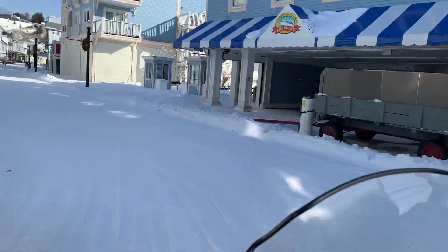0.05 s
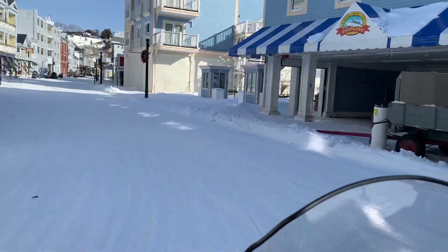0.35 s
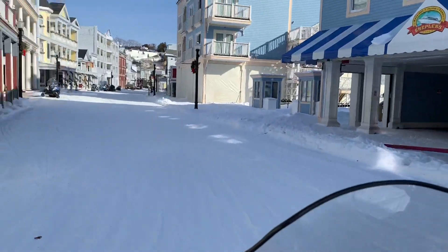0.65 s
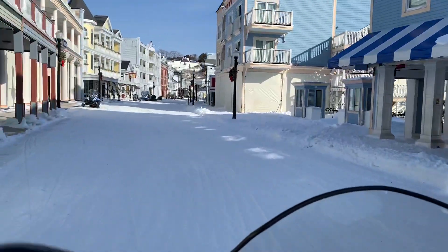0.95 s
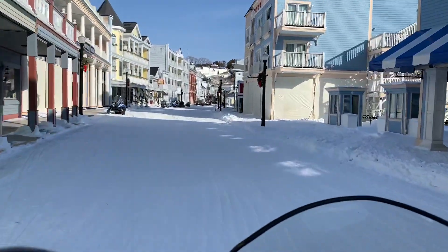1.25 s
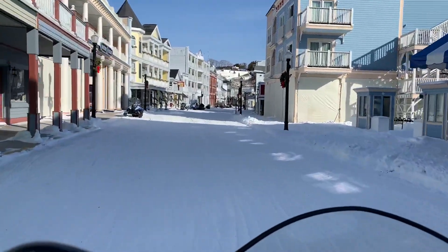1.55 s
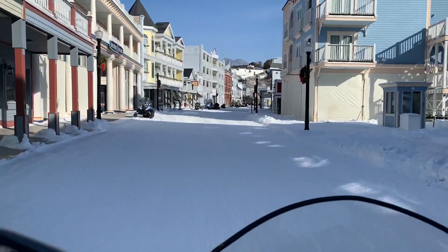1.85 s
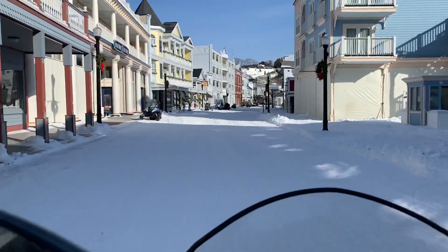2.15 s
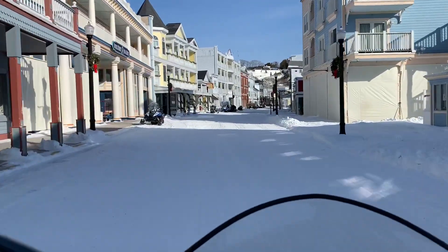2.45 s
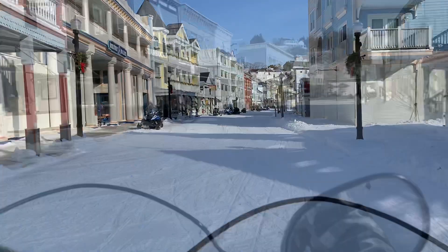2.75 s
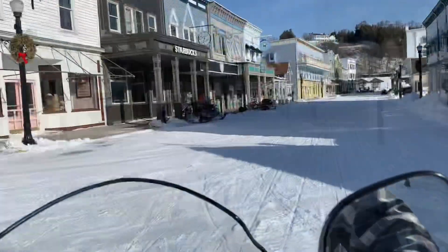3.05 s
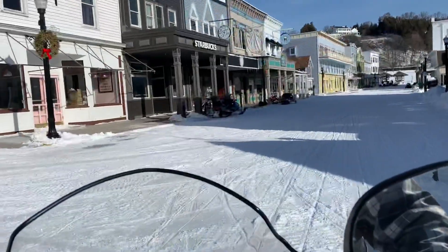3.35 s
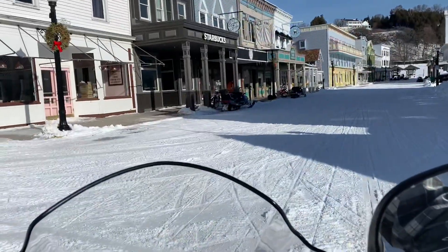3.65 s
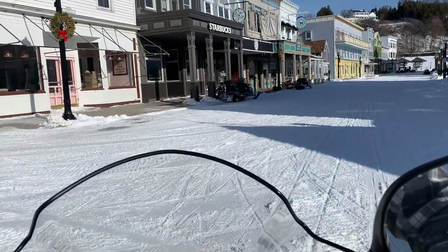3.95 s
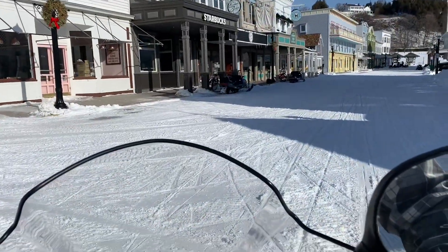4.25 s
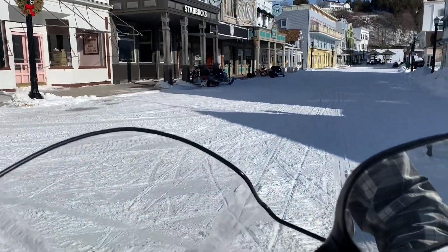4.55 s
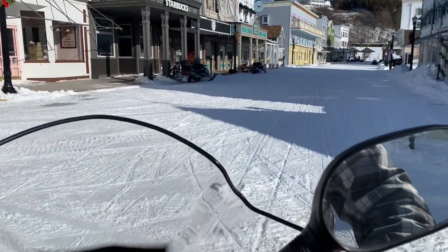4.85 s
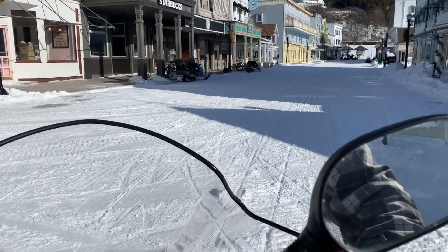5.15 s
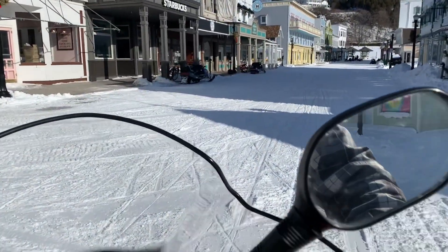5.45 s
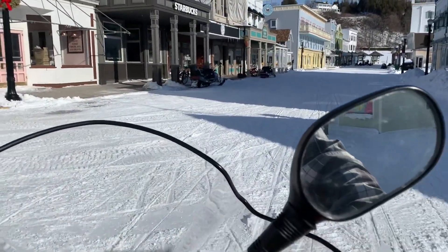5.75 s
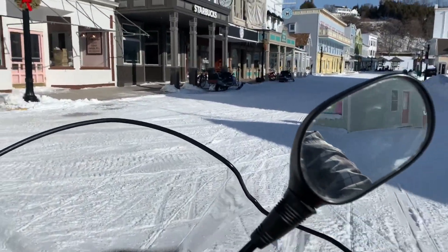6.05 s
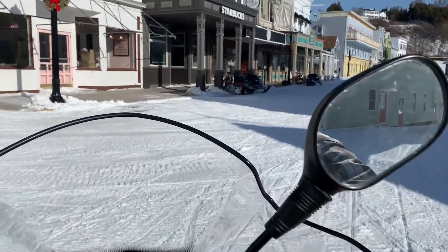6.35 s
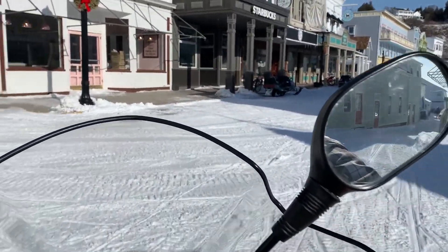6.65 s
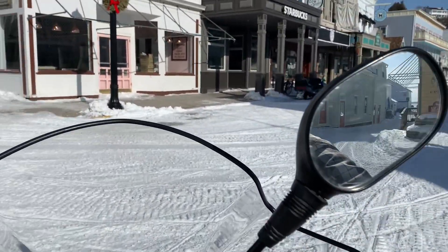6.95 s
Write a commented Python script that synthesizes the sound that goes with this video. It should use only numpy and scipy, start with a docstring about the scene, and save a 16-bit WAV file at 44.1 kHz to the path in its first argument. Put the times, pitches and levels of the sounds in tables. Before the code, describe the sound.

Outdoors, with the microphone at the rider's seat, a snowmobile runs at an even speed with a low boom and a mechanical rattle. The throttle closes, the skis bump twice, and the engine idles briefly. Then its pitch climbs through a shaking growl and a rush of intake air, tops out and drops to a steady drone. Snow hiss and wind rumble swell and fall with the engine.

```python
"""A snowmobile drones along a snowy street, heard from the saddle; as its skis knock, the scene changes and the
cruise fades out while an idling engine fades in. It revs up with a roar of air, shudders as the clutch grabs
the belt, peaks and settles. Three cylinders (four-stroke) fire in turn and make the muffler boom, while the
drive clatters. Track and skis hiss on packed snow, and wind buffets the microphone. Engine speed and throttle
steer the loudness of the boom, clatter, hiss and wind."""
import sys
import numpy as np
from scipy import signal
from scipy.fft import rfft, irfft, next_fast_len
from scipy.io import wavfile
from scipy.ndimage import uniform_filter1d, minimum_filter1d

SR = 44100
rng = np.random.default_rng(int(sys.argv[2]) if len(sys.argv) > 2 else 0)


def to_wav(sig):
    """Store sig (one row per channel, or 1-D mono) as 16-bit WAV at the path in sys.argv[1].

    Samples outside -1..1 are clipped; the rate is SR.
    """
    pcm = np.clip(np.atleast_2d(sig), -1, 1) * 32767
    pcm = np.round(pcm).astype(np.int16)
    wavfile.write(sys.argv[1], SR, pcm.T)  # frames by channels


N = 317079
TIME = np.arange(N) / SR
FFT_SIZE = next_fast_len(N, True)
BIN_HZ = np.maximum(np.arange(FFT_SIZE // 2 + 1) * SR / FFT_SIZE, 1)

# the cruise sags as the rider lets go (time [s], firing rate [Hz], change to the lowest tone [dB])
CRUISE_RUN = [(0, 100.8, -3), (0.3, 102.4, -3), (1.4, 102, -3.5), (1.75, 102.2, -2.5), (2.1, 101.8, -0.8),
              (2.56, 95, -3), (2.72, 95.1, -4.5), (2.9, 93.4, -9)]
# the pull: idle, climb, peak and settled run (time [s], firing rate [Hz])
PULL_RUN = [(2.8, 36.64), (3.01, 41.36), (3.2, 35.96), (3.28, 39), (3.37, 46), (3.5, 63.55), (3.54, 69.4),
            (3.69, 71.05), (3.95, 80.66), (4.25, 101.6), (4.41, 114.2), (4.65, 94.7), (4.88, 87.15),
            (5.33, 92.8), (5.7, 97.27), (6.35, 96.73), (6.55, 94.54), (7.19, 95.95)]
# the rider's thumb (time [s], throttle [0-1])
THUMB = [(0, 0.48), (2.1, 0.42), (2.55, 0.31), (2.9, 0.02), (3.25, 0.42), (3.52, 0.55), (3.72, 0.38),
         (4.1, 0.55), (4.26, 0.7), (4.42, 1), (4.68, 0.41), (5.7, 0.51), (7.19, 0.45)]
# An "order" is a tone at a multiple of the firing rate.
# orders 1 to 3 (level with throttle shut [dB], added by full throttle [dB])
BOOM_ORDERS = [(1, -3.5), (-1.5, 5.5), (-6.5, 11)]
# how the tailpipe passes those three (frequency [Hz], gain [dB])
TAILPIPE_GAIN = [(36, -38), (50, -17), (62, -14.5), (74, -9), (98, -7.5), (115, -11), (150, -19.5),
                 (200, -14.5), (232, -21), (262, -13.5), (285, -16.5), (305, -21), (345, -35)]
# higher tones in each puff of gas (order [x firing rate], level [dB])
HIGH_ORDERS = [(4, 2), (5, -4), (6, 0.5), (7, 1), (10, 2.5), (15, 8)]
# extra tones from unequal cylinders (multiple [x a third of the firing rate], level [dB])
UNEVEN_TONES = [(2, -16), (4, -11), (5, -13), (7, -39), (8, -7), (10, -12), (11, -6.5), (16, -5)]
# how the muffler passes the higher and extra tones (frequency [Hz], gain [dB])
MUFFLER_GAIN = [(30, -15), (70, 5.5), (150, 12), (230, 12), (290, 2.5), (350, -7), (420, -15), (460, 8),
                (490, 1), (530, -2), (590, -36), (675, -2), (780, -17), (980, -12.5), (1150, -45),
                (2000, -29)]
# where the tailpipe and muffler chambers ring (frequency [Hz], width [Hz])
PIPE_RINGS = [(100, 148), (245, 42), (280, 65)]
# how the boom reaches the two sides (frequency [Hz], left minus right [dB])
CRUISE_SIDES = [(100, -2.5), (200, -0.5), (380, -3), (700, 9)]
PULL_SIDES = [(60, 3.4), (110, 2.5), (200, 0.46), (380, 3.8), (700, 2.4)]
# clatter of clutch, chain case and track (frequency [Hz], level [dB])
CRUISE_CLATTER = [(250, 1.5), (400, 3.5), (560, 4), (800, -2), (1150, -4), (1700, -2.5), (2300, -11),
                  (3500, -12.5), (5000, -14.5), (7000, -34)]
PULL_CLATTER = [(250, 3.5), (400, 5.5), (520, 2), (620, 2.5), (900, -0.5), (1300, -2), (1680, -8.5),
                (2050, 0), (2700, -8), (3700, -10.5), (5000, -17), (7000, -23.5)]
# ringing panels and belt (frequency [Hz], half-width [Hz], level [dB])
CRUISE_PANELS = [(810, 26, -14), (924, 1.9, -15.5), (1600, 90, -16.5), (2040, 95, -13.5),
                 (2230, 380, -13.5), (3230, 86, -26), (3720, 470, -27.5)]
PULL_PANELS = [(527, 7.7, -7.5), (1007, 5.2, -13.5), (1225, 37, -14), (1390, 130, -10.5),
               (1977, 104, -10.5), (2240, 160, -15), (2950, 110, -18.5), (3500, 60, -23), (4000, 330, -34)]
# snow under skis and track (frequency [Hz], level [dB])
SNOW_TONE = [(2500, 2.5), (4500, -1.5), (6000, 7), (7800, 7), (9300, 8), (10500, 4.5), (12500, -14),
             (14000, 6.5), (16000, -59)]
# wind rumble (frequency [Hz], level [dB])
WIND_TONE = [(15, 0), (35, -7), (65, 9.5), (95, 13), (140, 4.5), (200, 8), (240, 5), (300, 9), (370, -4),
             (600, -49)]
# the skis hit ruts (time [s], rise [s], decay [s], level [dB])
RUT_HITS = [(2.533, .0005, 0.0064, -16), (2.762, 0.012, 0.022, -12)]
# the dull sound of a hit (frequency [Hz], level [dB])
KNOCK_TONE = [(200, -2), (400, 18), (620, 15), (1300, -8), (2500, -28), (6000, -38)]
# air sucked into the engine (frequency [Hz], level [dB])
INTAKE_TONE = [(300, -15), (550, -4), (800, 8), (1080, -10), (1450, -3.5), (2200, -13), (2900, -19),
               (4000, -23), (8000, -27)]
# jolts as the belt grips (time [s], half-length [s], level [dB])
BELT_GRABS = [(3.599, 0.044, -3.5), (3.778, 0.046, -4), (3.882, 0.024, -4.5), (3.949, 0.013, -1)]
# how alike the noise is on the left and right (frequency [Hz], correlation [0-1])
STEREO_LIKENESS = [(60, 0.84), (300, 0.85), (550, 0.55), (1100, 0.74), (1800, 0.22), (8000, 0.17),
                   (11000, 0.98)]

# loudness rules (level at 100 firings a second [dB], per doubling of speed [dB], full throttle adds [dB])
CRUISE_CLATTER_RULE, PULL_CLATTER_RULE = (-28.5, 1, 9.56), (-32, 4, 11.5)
HISS_RULE, WIND_RULE, HIGH_ORDER_RULE = (-44.5, 3.9, 11), (-22, 6.9, 1), (-35.5, 0.32, 10)


def undb(db):
    """Turn decibels into a gain."""
    return 10 ** (np.asarray(db) / 20)


def unit(x):
    """Scale a signal to an average (rms) size of 1."""
    return x / np.sqrt(np.mean(x ** 2))


def curves(table):
    """Draw each column of a time table as a curve, one value a sample."""
    times, *columns = np.transpose(table)
    return [np.interp(TIME, times, column) for column in columns]


def lookup(table, hz):
    """Read between a table's rows, with octaves evenly spaced."""
    row_hz, values = np.transpose(table)
    return np.interp(np.log(hz), np.log(row_hz), values)


def wander(rate_hz):
    """Smooth random motion, roughly between -1 and 1."""
    points = rng.standard_normal(4096)
    path = np.interp(TIME * rate_hz, np.arange(len(points)), points)
    return 1.01 * uniform_filter1d(path, max(int(SR / rate_hz / 2), 1))


def during(start_s, end_s, ramp_s):
    """1 between start and end, 0 outside, with a ramp at each edge."""
    return np.clip(.5 + np.minimum(TIME - start_s, end_s - TIME) / ramp_s, 0, 1)


def pan(db):
    """Left and right gains; a positive number favours the left."""
    return undb(np.array([[1], [-1]]) * db / 2)


def noise(shape):
    """Stereo noise with the given gain at each frequency; the two sides are partly alike."""
    alike = lookup(STEREO_LIKENESS, BIN_HZ)
    white = rfft(rng.standard_normal((2, FFT_SIZE)))
    mid, side = white * shape * np.sqrt([1 + alike, 1 - alike])
    return unit(irfft(np.array([mid + side, mid - side]), FFT_SIZE)[:, :N])


def effort_db(rule, hz, throttle):
    """A layer gets louder with engine speed and with throttle."""
    base_db, octave_db, throttle_db = rule
    return base_db + octave_db * np.log2(hz / 100) + throttle_db * throttle


def tailpipe_db(hz, throttle):
    """The tailpipe sets the levels of the three lowest tones; an open throttle brightens them."""
    return [lookup(TAILPIPE_GAIN, k * hz) + shut_db + open_db * throttle
            for k, (shut_db, open_db) in enumerate(BOOM_ORDERS, 1)]


def exhaust(hz, low_db, high_db, uneven_db, jitter_rad, flutter_db, burn_db):
    """Puffs of burnt gas make a stack of tones in the muffler. Returns the sound and the firing phase."""
    step = 8  # these tones are low, so every 8th sample is enough
    phase = 2 * np.pi * np.cumsum(hz) / SR + jitter_rad * wander(45)

    def order(k):
        """One tone; each pipe resonance it climbs past delays it by half a cycle."""
        tone_hz = k * hz[::step]
        lag = sum(np.arctan2(tone_hz * width, centre ** 2 - tone_hz ** 2) for centre, width in PIPE_RINGS)
        return np.cos(k * phase[::step] - lag)

    def muffled(k):
        """A weak tone, shaped by the muffler and by the rounded edge of the puff."""
        return undb(lookup(MUFFLER_GAIN, k * hz[::step])) * order(k) / np.sqrt(1 + (k / 7) ** 6)

    boom = sum(undb(db + flutter_db * wander(30))[::step] * order(k) for k, db in enumerate(low_db, 1))
    high = sum(undb(lookup(HIGH_ORDERS, k)) * muffled(k) for k in range(4, 16))
    uneven = sum(undb(db + uneven_db) * muffled(k / 3) for k, db in UNEVEN_TONES)
    burn = undb(high_db + burn_db * wander(40))[::step]  # no two cycles burn alike
    tones = boom + burn * (high + uneven)
    return np.sqrt(2) * signal.resample_poly(tones, step, 1, window=("kaiser", 10))[:N], phase


def around_rider(boom, sides, lead_s):
    """The boom bends round sled and rider: each side has its own level, and the left hears it first."""
    time_shift = np.exp(1j * np.pi * np.array([[1], [-1]]) * BIN_HZ * lead_s)
    return irfft(rfft(boom, FFT_SIZE) * pan(lookup(sides, BIN_HZ)) * time_shift, FFT_SIZE)[:, :N]


def clatter(tone, panels, phase, throb, rattle_db, waver_db):
    """The drive rattles, rings the panels, and swells with each firing and each round of three."""
    rattle = noise(undb(lookup(tone, BIN_HZ))) * undb(rattle_db * wander(130))
    for group in (panels[::2], panels[1::2]):  # neighbouring panels shake out of step
        rings = sum(undb(db) / np.sqrt(width) / (1 + ((BIN_HZ - hz) / width) ** 2)
                    for hz, width, db in group)
        strength = np.sqrt(sum(undb(db) ** 2 for _, _, db in group))
        rattle = rattle + noise(rings) * strength * undb(waver_db * wander(17))
    beat = 1 + throb * (np.cos(phase) + np.cos(phase / 3))
    return hood_echoes(rattle, echo_db=-1) * beat


def hood_echoes(stereo, echo_db, count=10):
    """Hood, windshield and handlebar send each side its own quick echoes."""
    echoes = np.zeros((2, FFT_SIZE))
    for side in echoes:
        delays_s = rng.uniform(.0003, .005, count)
        side[(delays_s * SR).astype(int)] = rng.choice([-1, 1], count) * undb(echo_db) / np.sqrt(count)
    reflected = BIN_HZ ** 2 / (BIN_HZ ** 2 + 950 ** 2)  # long waves bend round small parts
    return unit(irfft(rfft(stereo, FFT_SIZE) * (1 + reflected * rfft(echoes)), FFT_SIZE)[:, :N])


def cruise(hz, throttle, lowest_change_db):
    """The exhaust booms and the drive clatters at a steady speed."""
    lowest_db, *overtones_db = tailpipe_db(hz, throttle)
    boom, phase = exhaust(hz, [lowest_db + lowest_change_db, *overtones_db], high_db=-38, uneven_db=2,
                          jitter_rad=0.12, flutter_db=1.14, burn_db=6)
    drive = clatter(CRUISE_CLATTER, CRUISE_PANELS, phase, throb=0.023, rattle_db=1, waver_db=4)
    drive *= undb(effort_db(CRUISE_CLATTER_RULE, hz, throttle))
    return around_rider(boom, CRUISE_SIDES, lead_s=0.00039) + drive * pan(0.69)


def snow(hiss_db, sizzle_pan_db, sizzle_hz=8400, half_width_hz=420):
    """Skis and track crush fine grains of packed snow; beside this hiss, a separate thin band near 8.4 kHz sits
    to one side."""
    hiss = hood_echoes(noise(undb(lookup(SNOW_TONE, BIN_HZ))), echo_db=0)
    hiss *= undb(0.76 * wander(260) + 0.67 * wander(16))
    sizzle_band = 1 / (1 + ((BIN_HZ - sizzle_hz) / half_width_hz) ** 4)
    sizzle = noise(sizzle_band) * undb(-14 + 1.3 * wander(38))
    return (hiss + sizzle * pan(sizzle_pan_db)) * undb(hiss_db)


def wind(rumble_db):
    """Gusts and shaking make a low rumble on the microphone."""
    return noise(undb(lookup(WIND_TONE, BIN_HZ))) * undb(rumble_db + 1.6 * wander(12))


def ski_knocks():
    """The skis hit ruts with short, dull blows."""
    blows = 0
    for start_s, rise_s, decay_s, db in RUT_HITS:
        age = np.maximum(TIME - start_s, 0)
        blows = blows + undb(db) * (1 - np.exp(-age / rise_s)) * np.exp(-age / decay_s)
    return blows * noise(undb(lookup(KNOCK_TONE, BIN_HZ)))


def pull(hz, throttle, slip, jolts):
    """The engine idles, revs up and settles; its boom sags and sputters while the belt slips."""
    dip_db = -1.5 * jolts / jolts.max()  # each grab of the belt loads the engine
    lowest_db, *overtones_db = tailpipe_db(hz, throttle) + dip_db
    growl_db = 6.5 * during(3.87, 4.17, ramp_s=.06)  # the belt holds and the engine growls under load
    high_db = effort_db(HIGH_ORDER_RULE, hz, throttle) + growl_db + dip_db
    sag_db, sputter_db = -4.5 * slip, 2.5 * slip
    boom, phase = exhaust(hz, [lowest_db + sag_db, *overtones_db], high_db, uneven_db=-1.5,
                          jitter_rad=.02 + .08 * slip, flutter_db=.2 + sputter_db, burn_db=1.3 + sputter_db)
    drive = clatter(PULL_CLATTER, PULL_PANELS, phase, throb=0.035, rattle_db=0.9, waver_db=1.5)
    drive *= undb(effort_db(PULL_CLATTER_RULE, hz, throttle))
    return around_rider(boom, PULL_SIDES, lead_s=.0001) + (drive + intake(phase, throttle)) * pan(0.87)


def intake(phase, throttle, rasp_db=3):
    """The revving engine gulps air once per firing; more throttle makes it louder and grittier."""
    gulps = (1 + 0.26 * np.cos(phase)) * undb(rasp_db * throttle * wander(300))
    roar = during(3.34, 4.6, ramp_s=0.17) * undb(-42 + 14.5 * throttle)
    return noise(undb(lookup(INTAKE_TONE, BIN_HZ))) * gulps * roar


def shudder(jolts, frame_hz=86):
    """Each grab of the belt shakes the sled's frame for a few swings."""
    return jolts * np.cos(2 * np.pi * frame_hz * TIME + wander(8.3)) * pan(2.44)


def scene():
    """The cruise fades into the idle and the pull; snow and wind run through both."""
    cruise_hz, lowest_change_db = curves(CRUISE_RUN)
    pull_hz, = curves(PULL_RUN)
    throttle, = curves(THUMB)
    slip = during(3.56, 4.02, ramp_s=0.093)  # the belt slips while the clutch takes hold
    jolts = sum(undb(db) * np.exp(-((TIME - at_s) / half_s) ** 2) for at_s, half_s, db in BELT_GRABS)
    pulling = np.interp(TIME, [2.57, 2.99], [0, 1])
    cruising = 1 - pulling
    engine = np.sqrt(cruising) * cruise(cruise_hz, throttle, lowest_change_db)
    engine += pulling * pull(pull_hz, throttle, slip, jolts)
    hz = cruising * cruise_hz + pulling * pull_hz
    # a sled already at speed churns less snow and meets more wind
    hiss_db = effort_db(HISS_RULE, hz, throttle) - 0.5 * cruising
    rumble_db = effort_db(WIND_RULE, hz, throttle) + 2.5 * cruising
    rumble_db += 8.5 * slip  # the frame rumbles while the belt slips
    hiss = snow(hiss_db, sizzle_pan_db=-2 + 26.7 * pulling)
    return engine + hiss + ski_knocks() + wind(rumble_db) + shudder(jolts)


def record(dry):
    """A fast limiter turns down the loudest peaks, and the very highest treble is cut."""
    ceiling, hold_samples, top_hz = .95, 300, 15600
    safe_gain = np.minimum(1, ceiling / (np.abs(dry).max(axis=0) + 1e-9))
    gain = uniform_filter1d(minimum_filter1d(safe_gain, size=hold_samples), size=hold_samples)
    end_fades = np.clip(np.minimum(TIME, TIME[-1] - TIME) / .004, 0, 1)
    treble_cut = signal.ellip(14, .1, 90, top_hz, fs=SR, output="sos")
    return signal.sosfilt(treble_cut, dry * gain * end_fades)


dry = scene()
out = record(dry)
to_wav(out)
```